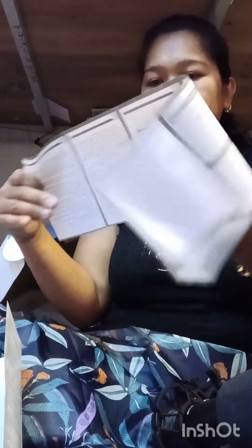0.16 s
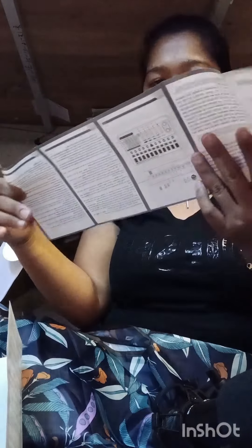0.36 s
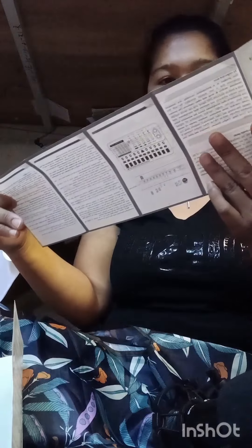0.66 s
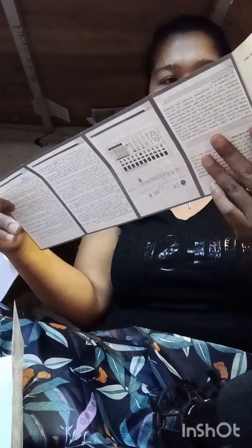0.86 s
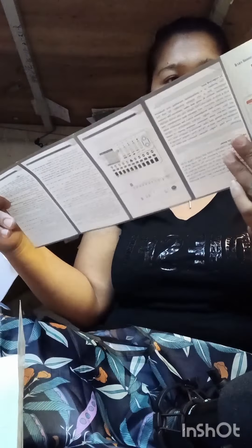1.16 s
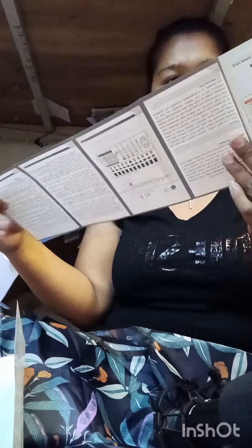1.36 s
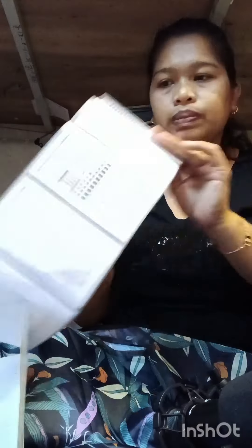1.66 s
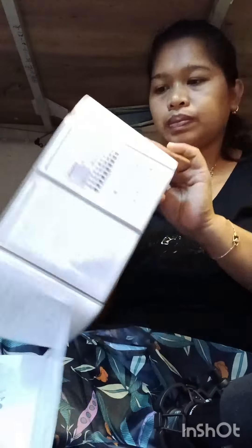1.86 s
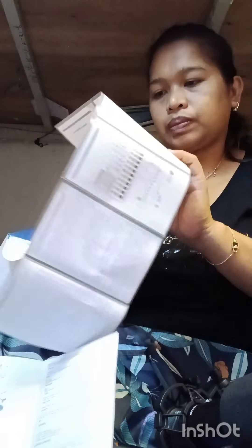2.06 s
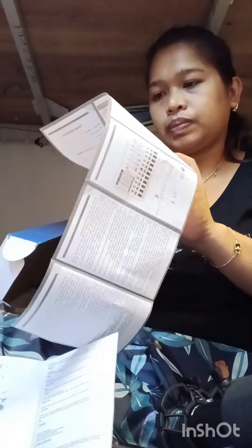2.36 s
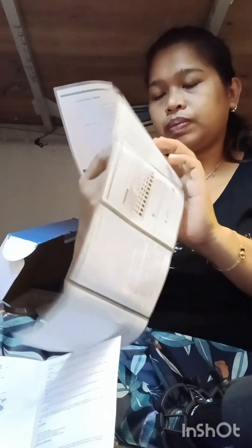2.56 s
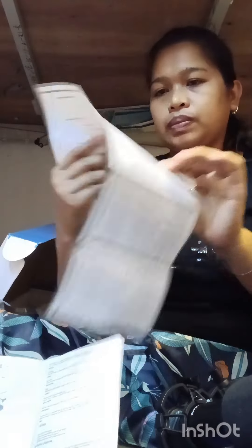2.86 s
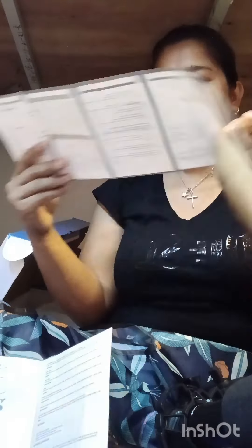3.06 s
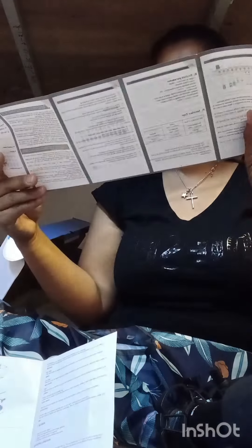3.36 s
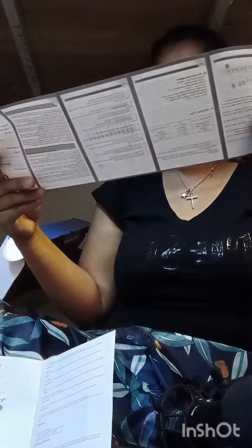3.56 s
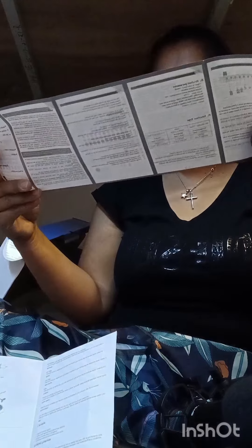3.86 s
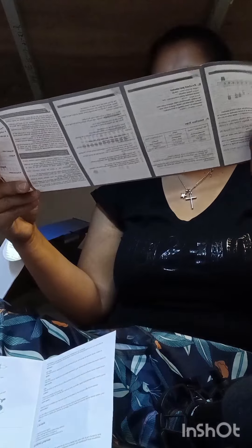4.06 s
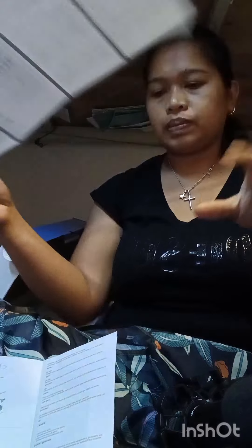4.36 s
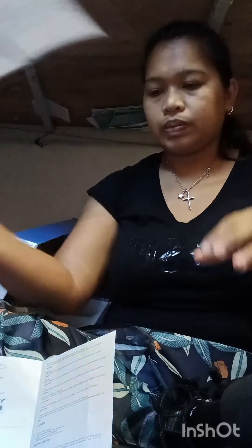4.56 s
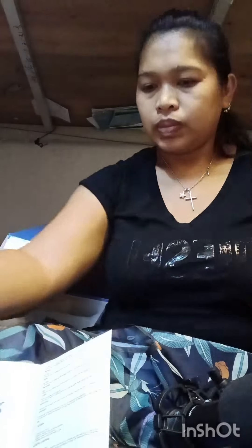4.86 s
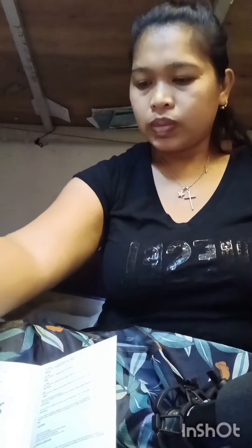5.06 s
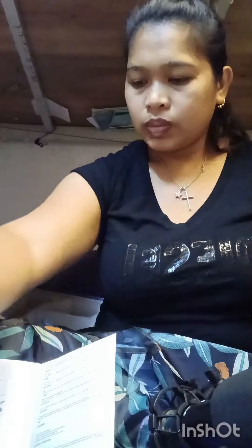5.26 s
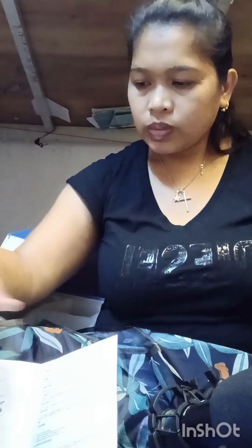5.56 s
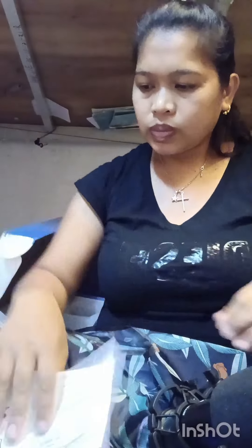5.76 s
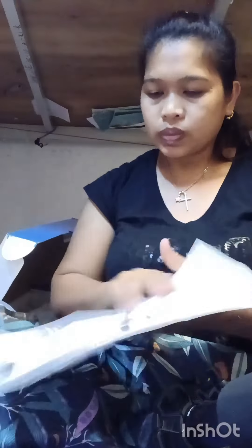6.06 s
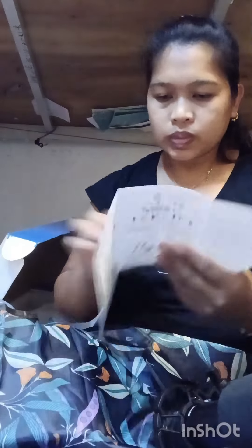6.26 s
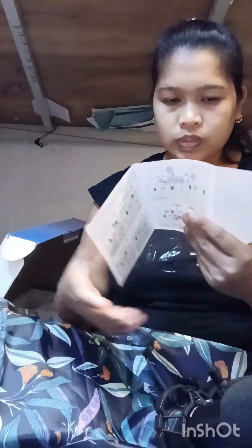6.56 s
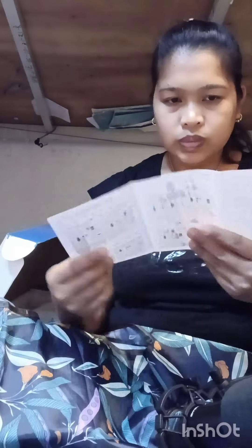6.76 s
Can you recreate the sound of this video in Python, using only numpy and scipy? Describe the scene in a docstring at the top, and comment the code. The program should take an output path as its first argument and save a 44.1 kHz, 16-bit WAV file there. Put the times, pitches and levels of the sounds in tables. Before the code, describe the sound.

A folded paper leaflet is handled close to the microphone in a small, quiet room. A soft push of air and light brushes lead to a few small ticks. The panels then buckle with crisp snaps and slide apart with a short hiss. After a lull, the paper bumps softly and crinkles in several quick clusters, ending with one faint tick over a low steady hum.

```python
"""A folded paper leaflet is unfolded, turned and swapped close to a phone in a small, quiet room.
It opens on a soft push of air and light brushes of paper on paper and fingers. Panels tick at 1.5 s,
then buckle near 2.7 s with hard snaps and a short flutter, and a long hissing pull draws them apart.
After a lull, the swung sheet bumps and snaps from 4.9 to 6.1 s, and one small tick ends the handling.
Two microphones of different colour hear it all, with short room reflections and a low steady hum."""
import sys
import numpy as np
from scipy import signal
from scipy.fft import rfft, irfft, next_fast_len
from scipy.io import wavfile
from scipy.ndimage import map_coordinates

SR = 44100
rng = np.random.default_rng(int(sys.argv[2]) if len(sys.argv) > 2 else 0)


def wrap_up_sound(samples):
    """Save the sound to the file named by the first command line argument, as 16-bit audio."""
    columns = np.atleast_2d(samples).T
    # keep every value between -1 and 1, then stretch to whole-number steps
    tamed = np.clip(columns, -1, 1)
    steps = np.round(tamed * 32767).astype(np.int16)
    wavfile.write(sys.argv[1], SR, steps)


N = 305171
TIME = np.arange(N) / SR
SIZE = 8192  # samples in one burst
WIDE_PANEL_HZ = 400  # hollow pitch of a wide panel; narrower ones sit higher


# body of a snap, the panel's broad resonance: multiple of its ring pitch, level/dB
PANEL_EQ = [(.1, -40), (.26, -16), (.4, -3), (.65, -2.5), (1.0, 4), (1.5, -1), (2.4, -3), (5, -45.5)]
# low end of a snap, the flapping sheet: f/Hz, level/dB
FLAP_EQ = [(60, -19), (170, -8), (290, 3.5), (450, 2), (600, -19), (1200, -28.5)]
# bright edge of a snap, the cracking crease: f/Hz, level/dB
CRACK_EQ = [(600, -55), (1800, -14), (3400, -7), (4500, -4), (7000, -5), (11000, -10.5), (15500, -16.5)]

def snap(decay_s, ring_hz, flap_db, crack_db, pan_db):
    """A buckle rings its panel, flaps the whole sheet and cracks the fibres in the crease."""
    panel = unit(colour(buckle(decay_s, spiky_db=2.5, alike=0.47), PANEL_EQ, ring_hz))
    pan = undb(np.array([[pan_db], [-pan_db]]) / 2)
    flap = unit(colour(buckle(0.88 * decay_s, spiky_db=5.0, alike=0.91), FLAP_EQ))
    crack = unit(colour(buckle(1.15 * decay_s, spiky_db=3.6, alike=.5), CRACK_EQ))
    return pan * panel + undb(flap_db) * flap + undb(crack_db) * crack


def buckle(decay_s, spiky_db, alike, build_up=0.36, pop=0.68, pop_s=0.0014):
    """Small slips build up, the crease pops through, then a flutter dies away."""
    t = (np.arange(SIZE) - SIZE // 4) / SR
    envelope = np.exp(-np.maximum(t, -t / build_up) / decay_s)
    force = unit(stereo_noise(SIZE, alike, spiky_db) * envelope)
    force[:, SIZE // 4] += pop * np.exp(-decay_s / pop_s)  # quick buckles are mostly one pop
    return force


# cues for buckling panels: t/s, level/dB over 10 ms, flutter decay/s, ring f/Hz, hollow f/Hz,
# hollow level/dB re the snap, crack level/dB re the snap, ring pan/dB (left minus right)
SNAP_CUES = [(1.3162, -57, .005, 1380, 1500, -1.5, -4, 1), (1.4865, -59.5, 0.0066, 2480, 3330, 3.5, 4, 12),
             (1.53, -55.5, 0.0097, 2200, 945, -1, -20, 10.5), (1.574, -50.5, 0.019, 1570, 400, 3, -7, 5),
             (1.5955, -39.5, 0.0034, 2360, 364, -4.5, -9, -1.5), (1.6219, -47.5, .007, 1990, 330, 1, 0, 10),
             (1.784, -62, .001, 1740, 1740, 2, -22, 7), (2.382, -48, 0.023, 2400, 1190, -21, -2.5, -9),
             (2.419, -56, 0.0057, 800, 378, -3, -15, 0), (2.654, -55.5, 0.0025, 1840, 450, -3, -5.5, 5.5),
             (2.681, -53.5, .005, 1840, 600, -14, -6.5, -1), (2.7255, -32, .0016, 1780, 760, -9.5, 2, 2),
             (2.733, -35, .012, 1490, 780, -15, 3.5, 4.5), (2.7759, -30, .003, 1900, 1100, -17, -5.5, 2.5),
             (2.86, -55, 0.021, 2000, 1890, 3, -7, -3), (3.0002, -53.5, 0.0034, 2620, 1895, 7.5, 5, 12),
             (3.044, -49.5, .008, 2000, 454, -9, 8, 9), (3.376, -54.5, 0.011, 1740, 470, -12, -17, 3.5),
             (4.924, -40, .006, 1920, 500, -12, -14, 0), (4.945, -33, 0.0029, 1590, 488, -1, -27, 5),
             (4.955, -34.5, 0.0026, 1830, 780, -2, -23, -2.5),
             (5.029, -53.5, 0.0088, 1000, 8800, 12.5, 0, 3), (5.067, -46, 0.0053, 1040, 1280, 0, -23, -11),
             (5.147, -58.5, 0.015, 1760, 1280, -9, -10, 1), (5.18, -60, 0.017, 1110, 4730, 9.5, -1, 3),
             (5.2358, -47.5, 0.00092, 2250, 2010, -3.5, -31, 8.5),
             (5.523, -55.5, 0.005, 905, 930, 1.5, -22, 6), (5.57, -52, .011, 940, 890, -8, -2.5, 3.5),
             (5.665, -50, 0.058, 1000, 322, -0.5, -15, -6), (5.746, -41, 0.013, 1010, 450, -14, -6, -1),
             (5.7648, -44, .0025, 1550, 442, -13, -8, 14),
             (5.783, -36.5, 0.0021, 1390, 247, -3.5, -29, -1.5),
             (5.917, -53.5, 0.014, 1900, 1500, -12, 0, 9.5), (5.9558, -45.5, 0.0036, 1450, 314, 3, 5.5, -8),
             (5.9665, -29, .004, 2340, 506, -7.5, 1, -14),
             (5.9801, -32.5, 0.023, 1890, 520, -6.5, 1.5, 5.5),
             (6.0823, -46.5, 0.00046, 2330, 2320, -11, -22, 18),
             (6.0896, -29.5, .0015, 2250, 464, -10, -4, 2.5),
             (6.622, -55, 0.0085, 1300, 1084, -1, -20, 6.5)]

def snaps(firm_db=-47, rebound_s=.0095, rebound_db=-13):
    """Each panel buckles, and after a firm snap springs back; wide panels flap the most."""
    out = np.zeros((2, N))
    for s, db, decay_s, ring_hz, hollow_hz, _, crack_db, pan_db in SNAP_CUES:
        flap_db = -9.5 - 4.5 * np.log2(hollow_hz / WIDE_PANEL_HZ)
        add(out, undb(db) * snap(decay_s, ring_hz, flap_db, crack_db, pan_db), s)
        if db > firm_db:
            rebound = snap(1.36 * decay_s, ring_hz, flap_db, crack_db, pan_db + 3.5)  # longer, more left
            add(out, undb(db + rebound_db) * rebound, s + rebound_s)
    return out


# hollow modes of a cupped panel: multiple of its hollow pitch, level/dB
HOLLOW_MODES = [(1.0, 1), (2.05, -7)]

def creaks(q=11, wide_decay_s=.014, damping=0.41):
    """The slips of each buckle drive the narrow modes of the cupped panel; low ones sing longest."""
    out = np.zeros((2, N))
    for s, db, _, _, hollow_hz, hollow_db, _, _ in SNAP_CUES:
        decay_s = wide_decay_s * (WIDE_PANEL_HZ / hollow_hz) ** damping
        slips = buckle(decay_s, spiky_db=2.5, alike=0.92)
        for multiple, mode_db in HOLLOW_MODES:
            b, a = signal.iirpeak(multiple * hollow_hz, q, fs=SR)
            add(out, undb(db + hollow_db + mode_db) * unit(signal.lfilter(b, a, slips)), s)
    return out


# brief strokes of paper on paper or skin: centre t/s, length/s, hiss level/dB
STROKE_CUES = [(.036, 0.049, -59.5), (0.928, 0.032, -57), (1.02, .056, -61), (1.604, 0.053, -57),
               (2.469, 0.012, -63), (3.046, 0.036, -46), (3.41, 0.077, -63.5), (4.058, 0.031, -62),
               (5.034, 0.025, -51.5), (5.269, .02, -58), (5.685, .02, -54.5), (5.804, 0.038, -52),
               (6.02, 0.0089, -36.5), (6.046, 0.024, -42)]
# fader ride of the long pull that parts the panels: t/s, hiss level/dB before the pull's gain
PULL_FADER = [(2.815, -56), (2.823, -58), (2.869, -48), (2.901, -51.5), (3.047, -46.5), (3.073, -52),
              (3.153, -54.5), (3.24, -91)]
# bright friction hiss: f/Hz, level/dB
HISS_EQ = [(1800, -33), (3300, 1), (5000, 5.5), (7000, -2), (11000, -0.5), (15500, -2)]
# midrange ring of a rubbed panel: f/Hz, level/dB
RUB_EQ = [(150, -6), (350, -8), (800, -8), (1300, -1), (1900, 4), (3000, 1), (5000, -4)]

def slides(pull_gain_db=5.5, light_touch_db=-60, light_rub_db=-59.5, rub_growth=0.72):
    """Fibres catch and slip in dense grains: a scraping hiss, and the ring of the rubbed panel."""
    pull_db = pull_gain_db + np.interp(TIME, *np.transpose(PULL_FADER), left=-np.inf, right=-np.inf)
    hiss_power = undb(pull_db) ** 2
    rub_power = undb(pull_db - 20.5) ** 2  # a taut panel hardly rings
    for s, length_s, db in STROKE_CUES:
        stroke = np.exp2(-np.minimum((2 * (TIME - s) / length_s) ** 2, 60))
        rub_db = light_rub_db + rub_growth * (db - light_touch_db)  # a firm touch mostly hisses
        hiss_power += stroke * undb(db) ** 2
        rub_power += stroke * undb(rub_db) ** 2
    broad_hiss = unit(colour(stereo_noise(N, alike=0.4), HISS_EQ))
    hiss = unit(broad_hiss + scrape())
    rub = unit(colour(stereo_noise(N, alike=0.37, spiky_db=2.3), RUB_EQ))
    grip = undb(1.6 * wander(120))  # the contact pressure flutters
    return np.sqrt(N) * grip * (np.sqrt(hiss_power) * hiss + np.sqrt(rub_power) * rub)


# bands that sing as paper slides on paper: f/Hz, width/Hz, level/dB re the broad hiss
SCRAPE_BANDS = [(3320, 190, -10), (5190, 860, -7), (6040, 240, -8.5), (6910, 200, -8.5), (10900, 470, -8)]

def scrape(drift=.045, drift_hz=18):
    """Narrow resonances of the sliding panel; they shift as its free length and curl change."""
    out = 0
    for hz, width, db in SCRAPE_BANDS:
        centre_hz = hz * (1 + drift * wander(drift_hz))
        noise = rng.standard_normal((2, N)) + 1j * rng.standard_normal((2, N))
        band = signal.sosfilt(signal.butter(2, width / 2, fs=SR, output="sos"), noise)
        carrier = np.exp(2j * np.pi * np.cumsum(centre_hz) / SR)
        out = out + undb(db) * unit(np.real(band * carrier))
    return out


# soft thumps as the sheet is swung or grabbed: centre t/s, half-length/s, f/Hz, envelope peak level/dB
BUMP_CUES = [(.075, 0.022, 71.4, -48), (5.07, 0.0085, 114, -46), (5.18, 0.011, 148, -47),
             (5.785, 0.014, 136, -53), (5.96, 0.0088, 255, -53)]

def bumps():
    """A swung sheet pushes a few cycles of air."""
    out = np.zeros(N)
    for s, half_s, hz, db in BUMP_CUES:
        t = TIME - s
        out += undb(db) * np.exp(-(t / half_s) ** 2) * np.sin(2 * np.pi * hz * t)
    return out


# treble ride, how squarely the sheet's edge faces the phone: t/s, top-octave level/dB
FACING_FADER = [(0, 3), (1.0, -1.5), (1.6, -3.5), (2.7, 3.5), (3.02, 2), (3.1, -10.5), (4.95, -4.5),
                (5.8, -0.5), (6.0, 2.5), (6.1, -3)]

def radiate(x, low_cut_hz=190, beam_hz=8500):
    """A thin sheet sheds little bass, and beams its top octave."""
    x = signal.sosfilt(signal.butter(3, low_cut_hz, "high", fs=SR, output="sos"), x)
    top = signal.sosfiltfilt(signal.butter(4, beam_hz, "high", fs=SR, output="sos"), x)
    top_gain = undb(np.interp(TIME, *np.transpose(FACING_FADER)))
    return x + (top_gain - 1) * top


def room(x, first_s=0.003, t60_s=0.11, wet_db=-6.5, walls_db=-11):
    """Near surfaces answer within milliseconds; the walls add a faint dull layer that dies with them."""
    t = np.arange(2 * SIZE) / SR
    fade_in = np.clip(2 * t / first_s - 1, 0, 1)
    echoes = stereo_noise(2 * SIZE, alike=0.32, spiky_db=5.5) * fade_in
    dull = signal.sosfilt(signal.butter(1, 3000, fs=SR, output="sos"), echoes)
    response = unit((echoes + undb(walls_db) * dull) * undb(-60 * t / t60_s))
    return x + undb(wet_db) * signal.fftconvolve(x, response, axes=1)[:, :N]


# bass-heavy room air: f/Hz, level/dB
AIR_EQ = [(20, -61), (40, -8.5), (75, 0), (105, 4), (150, -5), (260, -5), (340, -6.5), (550, -13.5),
          (1000, -18.5), (2200, -13), (3500, -20.5), (7000, -28), (9000, -25.5), (15500, -26)]
# low drones in the room: f/Hz, half-width/Hz, level/dB
HUM_BANDS = [(119.1, 9.7, -67), (195.4, 25, -71.5), (343.6, 26.6, -68.5), (459.6, 21, -76.5)]

def room_tone(air_db=-59.5):
    """Steady room air with a few droning bands of noise."""
    n = next_fast_len(N)
    f = np.arange(n // 2 + 1) * SR / n
    air = unit(colour(stereo_noise(N, alike=0.34, shared_hz=560), AIR_EQ))
    hum = 0
    for hz, half_width, db in HUM_BANDS:
        band = rfft(rng.standard_normal(n)) / (1 + ((f - hz) / half_width) ** 2)
        hum = hum + undb(db) * unit(irfft(band, n)[:N])
    left, right = np.sqrt(N) * (undb(air_db) * air + hum)
    return np.array([delay(left, lag_s=0.00016), right])


def undb(db):
    """Decibels to gain."""
    return 10 ** (np.asarray(db) / 20)


def unit(x):
    """Scale each channel to unit energy."""
    return x / np.sqrt(np.sum(x ** 2, axis=-1, keepdims=True) + 1e-18)


def colour(x, points, hz=1):
    """Minimum-phase EQ through (frequency in units of hz, dB) points."""
    n = 2 * next_fast_len((x.shape[-1] + SIZE) // 2)
    freq, db = np.transpose(points)
    f = np.maximum(np.arange(n // 2 + 1), 1) * SR / n
    gain = undb(np.interp(np.log(f), np.log(freq * hz), db))
    cepstrum = irfft(np.log(gain))
    cepstrum[1:n // 2] *= 2
    cepstrum[n // 2 + 1:] = 0
    return irfft(rfft(x, n) * np.exp(rfft(cepstrum)))[..., :x.shape[-1]]


def stereo_noise(size, alike, spiky_db=0, shared_hz=480):
    """Noise, near mono in the bass and partly alike above; spiky_db breaks it into uneven grains."""
    n = next_fast_len(size)
    f = np.arange(n // 2 + 1) * SR / n
    shared = np.clip(alike + (.97 - alike) / (1 + (f / shared_hz) ** 4), 0, 1)
    noise = rfft(rng.standard_normal((3, n)))
    spectrum = np.sqrt(shared) * noise[0] + np.sqrt(1 - shared) * noise[1:]
    grain_db = spiky_db * np.minimum(rng.exponential(size=size // 8 + 1), 4.5)
    return unit(undb(grain_db).repeat(8)[:size] * irfft(spectrum, n)[:, :size])


def wander(rate):
    """Random modulation with a spread near 1, turning rate times a second."""
    knots = rng.standard_normal(int(rate * N / SR) + 2)
    return np.interp(TIME * rate, np.arange(len(knots)), knots)


def delay(x, lag_s):
    """Delay one channel by a time that may move."""
    return map_coordinates(x, [np.arange(N) - lag_s * SR], order=3)


def add(out, burst, s):
    """Mix in a burst with its peak, a quarter of the way along, at time s."""
    start = int(s * SR) - SIZE // 4
    out[:, start:start + SIZE] += burst[:, :N - start] * np.sqrt(SR / 100)  # unit energy: 0 dB over 10 ms


# the sheet's path across the stereo image: t/s, left microphone delay/s
SHEET_PATH = [(0, -0.00013), (4.2, 0.00052), (4.949, 0.00045), (5.2, 0.0023), (5.6, .00013), (6.9, 0.00032)]

def scene():
    """The leaflet moves across the two microphones in its room."""
    paper = radiate(snaps() + creaks() + slides())
    left, right = room(paper) + bumps()
    lag_s = np.interp(TIME, *np.transpose(SHEET_PATH))
    return np.array([delay(left, lag_s), right]) + room_tone()


# mid-forward left microphone: f/Hz, level/dB
LEFT_MIC_EQ = [(100, -4), (450, -1), (600, 3.5), (780, 5.5), (1300, 3), (2150, 4), (3000, 1), (4200, -6),
               (5600, -28), (7300, -4.5), (8800, -14), (11000, -19.5), (13500, -16), (15500, -17)]
# brighter right microphone: f/Hz, level/dB
RIGHT_MIC_EQ = [(100, -4), (430, -2.5), (640, -6.5), (850, 0), (1300, -1), (1800, -0.5), (2300, -3.5),
                (4000, -3), (7000, -2.5), (8200, -8.5), (9800, -2), (11100, 6), (12300, -5), (13600, -6.5),
                (15200, 0)]

def record(dry, hiss_db=-72.5, high_cut_hz=15700):
    """Each microphone has its own colour and a faint hiss; the top is cut."""
    heard = np.array([colour(dry[0], LEFT_MIC_EQ), colour(dry[1], RIGHT_MIC_EQ)])
    hiss_eq = [(3000, 3.5), (6800, 5.5), (8200, -9.5), (15000, -14.5)]  # f/Hz, level/dB
    hiss = unit(colour(rng.standard_normal((2, N)), hiss_eq))
    heard = heard + undb(hiss_db) * np.sqrt(N) * hiss
    return signal.sosfilt(signal.ellip(10, .2, 70, high_cut_hz, fs=SR, output="sos"), heard)


dry = scene()
out = record(dry)
wrap_up_sound(out)
```